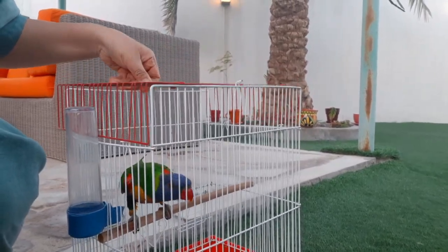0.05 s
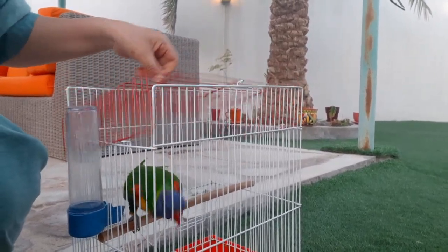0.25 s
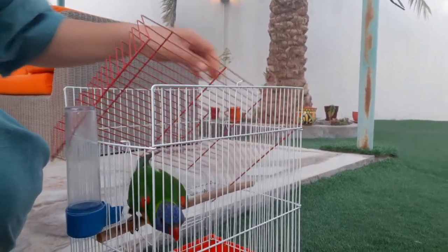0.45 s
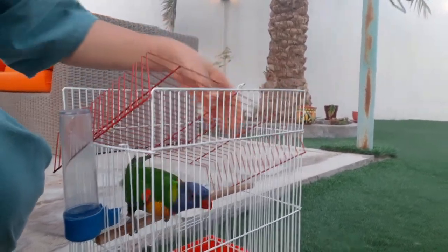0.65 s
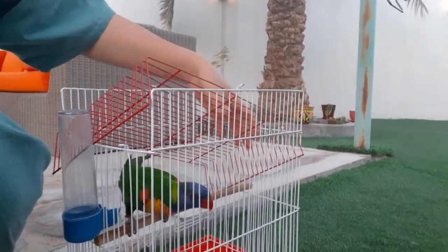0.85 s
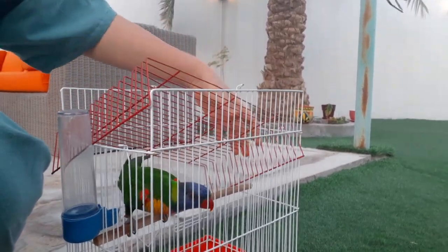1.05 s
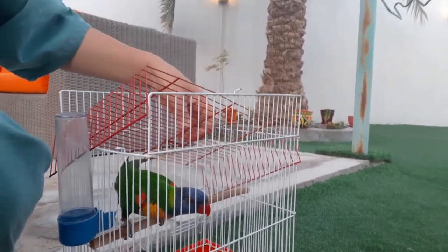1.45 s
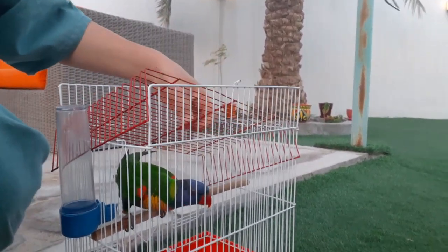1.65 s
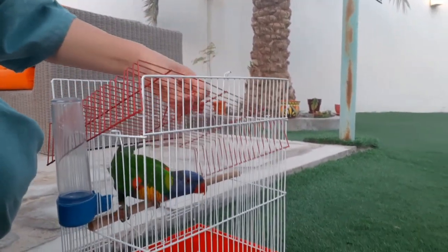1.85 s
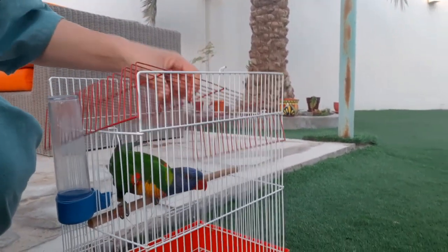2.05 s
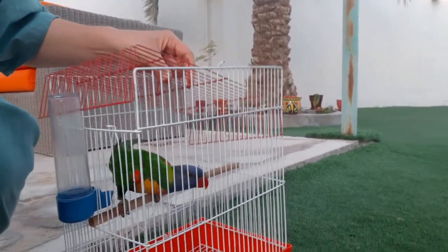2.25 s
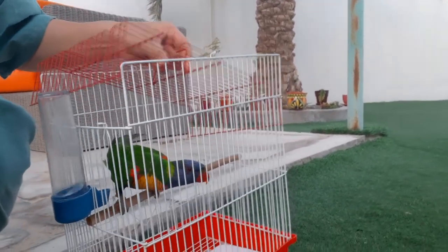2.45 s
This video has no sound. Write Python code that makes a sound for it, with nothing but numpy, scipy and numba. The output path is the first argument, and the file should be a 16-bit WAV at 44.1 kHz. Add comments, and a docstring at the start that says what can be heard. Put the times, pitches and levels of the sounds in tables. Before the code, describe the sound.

A wire cage lid clanks down, rattles, then ticks faintly against the bars outdoors.

```python
"""The wire lid of a bird cage is lifted on a patio; each impact excites the many modes of the thin wires.
The lid slips and clanks down into the cage, its thick rim resonating, and from about 0.5 s rattles out.
From 0.8 s a hand damps the wires and works the lid free, so that it ticks against the bars.
At 1.7 s all sound drops out for an instant, and a few faint ticks follow.
Outdoor air, a thin hiss, a low rumble and a motor's hum lie behind it throughout."""
import sys
import numpy as np
from numba import njit
from scipy import signal
from scipy.fft import rfft, irfft
from scipy.io import wavfile
from scipy.ndimage import uniform_filter1d

SR = 44100
rng = np.random.default_rng(int(sys.argv[2]) if len(sys.argv) > 2 else 0)


def master(y):
    """Save y as 16-bit WAV."""
    cut = np.clip(np.atleast_2d(y).T, -1, 1)
    pcm = np.round(cut * 32767)  # scale
    wavfile.write(sys.argv[1], SR, pcm.astype(np.int16))


N = 114660
T = np.arange(N) / SR

# Wire striking wire: start_s, level_db, tilt_db_per_octave, chatter_length_s
WIRE_CONTACTS = [(.108, -43.5, -0.5, 0.0049), (0.2146, -25, 1.5, 0.0021), (.232, -27, -1, 0.021),
                 (0.284, -34, 0.5, 0.065), (0.3407, -26, -3.5, 0.0017), (.357, -26, 1.3, 0.0062),
                 (0.4058, -22, 2, .001), (0.4229, -22.5, 4, 0.0073), (0.4327, -21, 1.9, .002),
                 (0.4371, -21, 0.5, .0015), (0.4522, -26.5, 3, .002), (0.508, -35.5, 3, 0.0098),
                 (.533, -27.5, -1.5, 0.011), (.586, -29, -1.5, 0.0026), (.612, -36, 1, 0.0064),
                 (0.787, -38.5, -1, 0.0064), (.822, -38, -4.5, 0.0022), (0.832, -40.5, -0.5, 0.0043),
                 (0.843, -42, 1.5, 0.0036), (0.952, -37.5, -1.7, .002), (1.059, -51, -5.5, .006),
                 (1.126, -47.5, -4, 0.011), (1.269, -45.5, -3.5, 0.01), (1.479, -43.5, 2, 0.021),
                 (1.614, -39, 2.5, 0.0033), (1.8198, -55, 0.5, 0.008), (1.842, -46, 1.8, 0.0048),
                 (1.978, -47, -2.5, 0.013), (1.992, -42, -1, .014), (2.056, -49.5, -3, 0.0076),
                 (2.192, -50.5, -3, 0.051)]
def chatter(count=6, loss_db=3.5):
    """Inelastic rebound: a contact divides its energy among weakening touches on one spot."""
    start_s, level_db, tilt, length_s = np.transpose(WIRE_CONTACTS)[:, :, None]
    chance = rng.random((len(start_s), count))
    jitter = (chance - .5) * (np.arange(count) > 0)
    progress = (np.arange(count) + jitter) / count
    bounce_db = -loss_db * progress
    bounce_db -= 10 * np.log10(np.sum(from_db(bounce_db) ** 2, axis=1, keepdims=True))
    spot = chance[:, :1]
    columns = np.broadcast_arrays(start_s + length_s * progress, level_db + bounce_db, tilt, spot)
    return np.column_stack([column.ravel() for column in columns])


def rattle(count=36, start_s=.47, touches_per_s=120, start_db=-31.5, fade_db_per_s=48.5):
    """Dissipation: the dropped lid shakes itself out in uneven touches that fade exponentially."""
    age_s = (np.arange(count) + rng.uniform(0, 2, count)) / touches_per_s
    level_db = start_db - fade_db_per_s * age_s + 1.5 * rng.standard_normal(count)
    tilt, spot = np.full(count, .64), rng.random(count)
    return np.column_stack([start_s + age_s, level_db, tilt, spot])


# Spectral envelope of the wires: frequency_hz, relative_density_db
WIRE_SPECTRUM = [(170, -17), (260, -4), (390, -8.5), (600, -6.5), (880, -0.5), (1250, -5), (1800, -4.5),
                 (3000, -9), (4100, -9.5), (6500, -8), (8700, -14.5), (12000, -16), (16000, -25)]
# Time for the wires to decay by 60 dB: frequency_hz, t60_s
WIRE_DECAY = [(150, 1), (900, 0.53), (2500, 0.4), (6000, 0.15), (15000, 0.24)]
# Notes shared by wires of like length: pitch_hz, lift_db
WIRE_RESONANCES = [(305, 7), (590, -10), (845, 3), (915, 3), (1000, 0), (1770, 4), (1915, 3.5), (2410, 6),
                   (2660, 4), (3590, 5.5), (3750, 9), (4050, 8.5)]
def wire_modes(count=1500, note_width=.025):
    """Modal overlap: many wires give closely spaced modes, weighted by the notes they share."""
    hz = 100 + 15800 * ((np.arange(count) + rng.random(count)) / count) ** 2
    lift_db = sum(db / (1 + (2 * (hz - note) / (note_width * note)) ** 2) for note, db in WIRE_RESONANCES)
    level_db = at_hz(WIRE_SPECTRUM, hz) + lift_db + 1.5 * rng.standard_normal(count)
    spacing = np.sqrt(hz - hz[0] + 1)   # sparser modes each carry more power
    gain = from_db(level_db) * np.sqrt(spacing)
    return hz, gain / np.linalg.norm(gain), at_hz(WIRE_DECAY, hz)


PIVOT_HZ = 1990   # spectral tilts turn about this frequency
def wires(touches):
    """Impulse response: each touch starts with a crack and excites every mode by a different amount."""
    start_s, level_db, tilt, spot = touches[np.argsort(touches[:, 0])].T
    onsets = np.clip((start_s * SR).astype(int), 0, N - 1)
    cracks = crack(onsets, level_db)
    hz, gain, t60_s = wire_modes()
    phasors = np.exp(2j * np.pi * rng.random((2, len(hz))))
    ears = spread(*phasors, hz) * cage_pan(hz)
    octaves = np.log2(np.maximum(hz, 600) / PIVOT_HZ)   # the tilt levels off in the bass
    strength = from_db(level_db[:, None] + np.outer(tilt, octaves))
    kicks = np.sqrt(2) * gain * rng.standard_normal(strength.shape) * strength
    kicks *= spot_colour(spot, hz)
    return cracks + ring(onsets, kicks, poles(hz, t60_s), *ears, hand_damping())


def crack(onsets, level_db, t60_s=.012, tilt_db_per_octave=-1):
    """Contact transient: the harsh start of each touch is a burst of broadband noise."""
    def spectrum(hz):
        tilt_db = tilt_db_per_octave * np.log2(hz / PIVOT_HZ)
        return from_db(at_hz(WIRE_SPECTRUM, hz) + tilt_db) * cage_pan(hz)
    fade = np.exp(-2 * np.log(1000) / (t60_s * SR))
    impulses = np.bincount(onsets, from_db(level_db) ** 2, N)
    power = signal.lfilter([1], [1, -fade], impulses + 1e-18)
    return noise(spectrum) * np.sqrt(power)


def spot_colour(spot, hz, depth_db=4, width_hz=180, count=4000):
    """Point of excitation: each struck spot (0 to 1) favours its own groups of modes."""
    groups = rng.standard_normal(count)
    position = count * spot[:, None] + hz / width_hz
    gain = from_db(depth_db * np.interp(position, np.arange(count), groups, period=count))
    return gain / np.sqrt(np.mean(gain ** 2, axis=1, keepdims=True))


# The lid's rim knocking on the cage: start_s, level_db
RIM_KNOCKS = [(.2145, -22), (.358, -25), (.4064, -20), (.4335, -17), (2.001, -46)]
# Modes of the rim: pitch_hz, relative_level_db, t60_s
RIM_MODES = [(289.3, -9.5, 0.12), (618.7, 1.5, 0.051), (836, -11.5, 0.32), (1587, -17, .25),
             (1885, -15.5, .3), (2428, -16.5, .2), (4205, -11.5, 0.23)]
def rim():
    """Free vibration: knocks leave the thick rim ringing with a hollow clank and a few clear partials."""
    start_s, level_db = np.transpose(RIM_KNOCKS)
    hz, mode_db, t60_s = np.transpose(RIM_MODES)
    polarity = np.sign(rng.standard_normal((len(start_s), len(hz))))
    uneven_db = 1.5 * rng.standard_normal(polarity.shape)
    kicks = 1j * polarity * from_db(level_db[:, None] + mode_db + uneven_db)
    ears = cage_pan(hz) + 0j
    return ring((start_s * SR).astype(int), kicks, poles(hz, t60_s), *ears, hand_damping())


def hand_damping(start_s=.82, loss_db_per_s=52):
    """Added damping: once the hand rests on the wires, each sample keeps less of the ringing."""
    return from_db(-loss_db_per_s * (T > start_s) / SR)


def poles(hz, t60_s):
    """Damped oscillation: a mode turns and shrinks by one complex factor per sample."""
    return np.exp((2j * np.pi * hz - np.log(1000) / t60_s) / SR)


@njit(fastmath=True)
def ring(onsets, kicks, pole, left, right, damping):
    """Modal superposition: decaying modes, kicked in time order, add up at each ear."""
    out, state, k = np.zeros((2, len(damping))), np.zeros_like(pole), 0
    for n in range(len(damping)):
        while k < len(onsets) and onsets[k] <= n:
            state += kicks[k]
            k += 1
        left_sum = right_sum = 0.
        for m in range(len(pole)):
            mode = state[m] * pole[m] * damping[n]
            state[m] = mode
            left_sum += (mode * left[m]).real
            right_sum += (mode * right[m]).real
        out[0, n], out[1, n] = left_sum, right_sum
    return out


# Stereo balance of the cage: frequency_hz, left_minus_right_db
CAGE_BALANCE = [(200, -2), (700, -4), (1300, -3.5), (2400, -8), (4400, -8), (8100, -3.5), (15000, -2.5)]
def cage_pan(hz):
    """Interaural level difference: the cage is louder on the right, most of all in the low treble."""
    return pan(at_hz(CAGE_BALANCE, hz))


# The motor's lowest three harmonics: time_s, first_db, second_db, third_db
HUM_LEVELS = [(.4, -61, -58, -54), (.6, -90, -67, -51), (1.0, -78, -54.5, -54), (1.25, -70.5, -61, -58),
              (1.5, -50.5, -48.5, -49), (1.7, -47.5, -50.5, -53), (1.74, -70, -48.5, -72),
              (1.88, -51, -42.5, -61), (1.97, -58.5, -56, -64), (2.38, -51, -55, -60),
              (2.6, -53, -44, -61.5)]
# Its higher harmonics: harmonic_number, level_re_third_db
HUM_UPPER_HARMONICS = [(5, -6.5), (9, -20)]
def motor_hum(pitch_hz=60.47, waver_depth=.0158, count=26):
    """Harmonic series: a motor's partials swell and fade over one slightly wavering fundamental."""
    waver = np.interp(T, np.linspace(0, T[-1], count), rng.standard_normal(count))
    phase = 2 * np.pi * np.cumsum(pitch_hz * (1 + waver_depth * waver)) / SR
    levels = in_time(HUM_LEVELS)
    harmonics = list(enumerate(levels, 1)) + [(k, levels[-1] + db) for k, db in HUM_UPPER_HARMONICS]
    partials = [from_db(db) * np.sin(k * phase + rng.uniform(0, 2 * np.pi)) for k, db in harmonics]
    return np.sqrt(2) * sum(partials)


# Outdoor air before its bass roll-off: frequency_hz, relative_density_db
AIR_SPECTRUM = [(180, -20), (300, 0.5), (486, -6.5), (565, 0.5), (645, -11), (1060, -9), (1560, -15),
                (4090, -22), (4440, -20.5), (5160, -28), (16000, -49.5)]
# Envelope of the air: time_s, level_db
AIR_ENVELOPE = [(0, -50), (.6, -35.5), (1.2, -53.5), (1.4, -50.5), (1.68, -48), (1.8, -56), (2.2, -53),
                (2.4, -56.5), (2.6, -54.5)]
def air(highpass_hz=280):
    """Amplitude modulation: the broadband noise of outdoor air slowly swells and sinks."""
    wash = noise(lambda hz: from_db(at_hz(AIR_SPECTRUM, hz)) / np.hypot(1, (highpass_hz / hz) ** 2))
    return from_db(in_time(AIR_ENVELOPE)[0]) * wash


# The rumble before its treble roll-off: frequency_hz, relative_density_db
RUMBLE_SPECTRUM = [(25, -18.5), (45, -4), (70, 5.5), (130, 5.5), (200, 7), (280, 4.5), (400, -38)]
# Envelope of the rumble: time_s, level_db
RUMBLE_ENVELOPE = [(0, -54), (.5, -47), (1.2, -52.5), (1.9, -53), (2.08, -45.5), (2.25, -52.5), (2.4, -51),
                   (2.6, -47)]
def rumble(lowpass_hz=1990):
    """Low-frequency noise: power gathered in the bass is heard as a rumble, drifting in level."""
    bass = noise(lambda hz: from_db(at_hz(RUMBLE_SPECTRUM, hz)) / np.hypot(1, hz / lowpass_hz))
    return from_db(in_time(RUMBLE_ENVELOPE)[0]) * bass


def hiss(centre_hz=4500, width_hz=200, level_db=-71.5):
    """Narrowband noise: a single spectral peak is heard as a thin, steady hiss."""
    return from_db(level_db) * noise(lambda hz: 1 / (1 + (2 * (hz - centre_hz) / width_hz) ** 2))


# Likeness of left and right: frequency_hz, correlation
EAR_COHERENCE = [(250, .96), (700, .86), (1400, 0.66), (3000, 0.25), (6500, 0.0), (15000, .25)]
def spread(mid, side, hz):
    """Interaural coherence: the channels are alike in the bass and nearly unrelated in the treble."""
    alike = at_hz(EAR_COHERENCE, hz)
    return (np.sqrt(1 + alike) * mid + np.sqrt(1 - alike) * side * np.array([[1], [-1]])) / np.sqrt(2)


def noise(gain_at):
    """Spectral shaping: white noise is filtered into steady stereo noise of unit rms."""
    hz = np.maximum(np.fft.rfftfreq(N, 1 / SR), 1)
    mid, side = rfft(rng.standard_normal((2, N)))
    shaped = irfft(spread(mid, side, hz) * gain_at(hz), N)
    return shaped / np.sqrt(np.mean(shaped ** 2))


def pan(left_minus_right_db):
    """Constant-power panning: left and right gains for a level difference."""
    gains = from_db(np.array([[1], [-1]]) * left_minus_right_db / 2)
    return gains / np.sqrt(np.mean(gains ** 2, axis=0))


def from_db(db):
    """Decibel law: 20 dB is a tenfold amplitude."""
    return 10 ** (np.asarray(db) / 20)


def in_time(rows):
    """Linear interpolation: a table's columns at every sample."""
    time_s, *columns = np.transpose(rows)
    return [np.interp(T, time_s, column) for column in columns]


def at_hz(rows, hz):
    """Logarithmic frequency scale: a table is interpolated by octaves."""
    table_hz, values = np.transpose(rows)
    return np.interp(np.log(hz), np.log(table_hz), values)


def scene(left_lag_s=.00007):
    """Interaural delay: the nearby cage reaches the right ear first, over the outdoor background."""
    touches = np.vstack([chatter(), rattle()])   # start_s, level_db, tilt_db_per_octave, spot
    left, right = wires(touches) + rim()
    cage = np.array([np.roll(left, round(left_lag_s * SR)), right])
    background = air() + rumble() + hiss() + motor_hum()
    return cage + background * pan(left_minus_right_db=-1.6)


def record(dry, dropout_s=1.7075, length_s=.027, dropout_db=-30, cutoff_hz=15500):
    """Attenuation and band limiting: the sound drops out once, and a steep low-pass cuts the top."""
    gap = (T > dropout_s) & (T < dropout_s + length_s)
    gain = uniform_filter1d(from_db(dropout_db * gap), size=40)
    lowpass = signal.ellip(12, .2, 80, cutoff_hz, fs=SR, output="sos")
    return signal.sosfilt(lowpass, dry * gain)


dry = scene()
out = record(dry)
master(out)
```